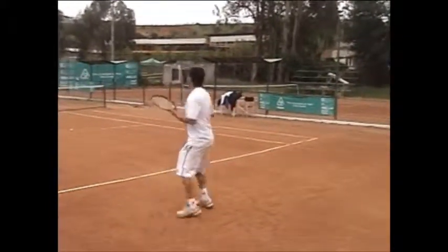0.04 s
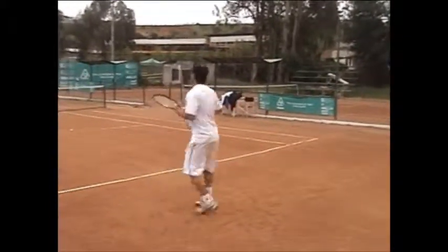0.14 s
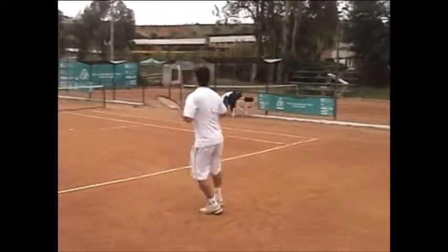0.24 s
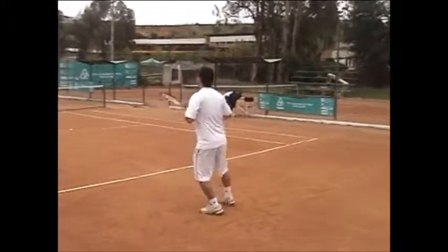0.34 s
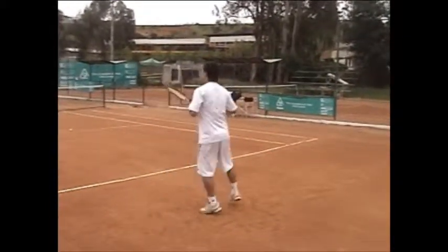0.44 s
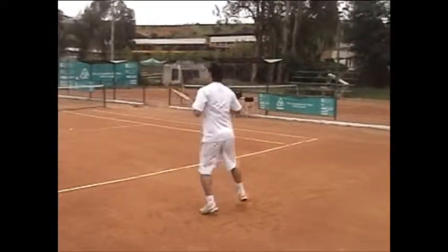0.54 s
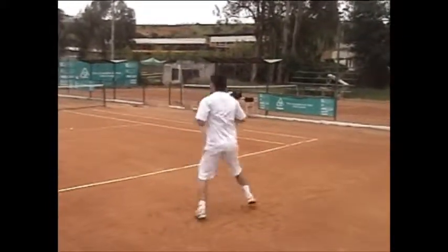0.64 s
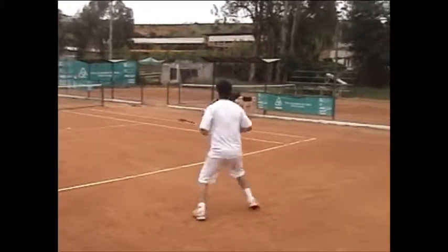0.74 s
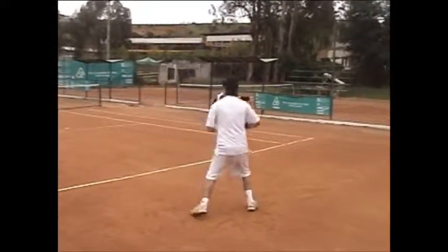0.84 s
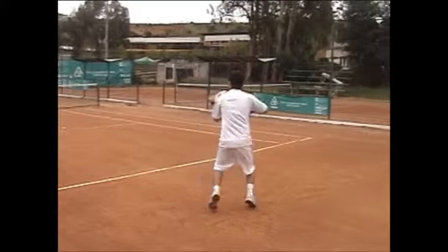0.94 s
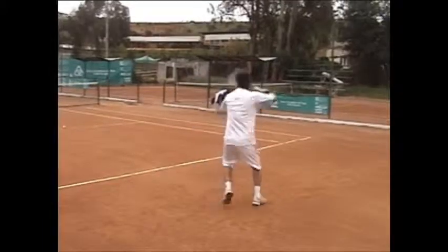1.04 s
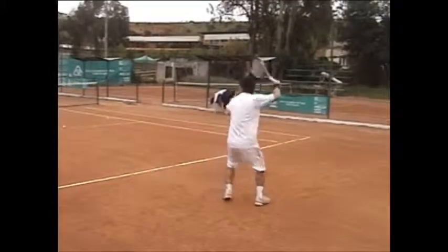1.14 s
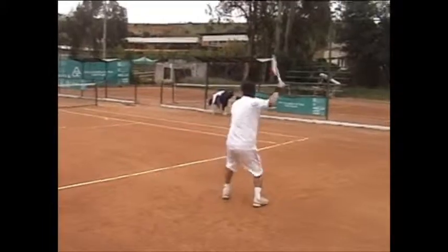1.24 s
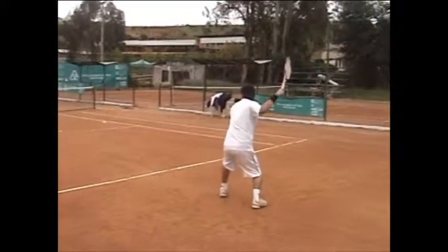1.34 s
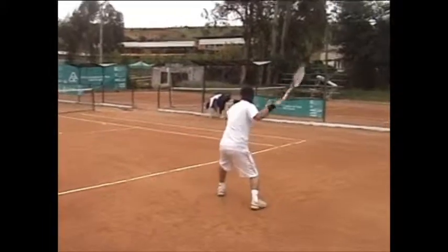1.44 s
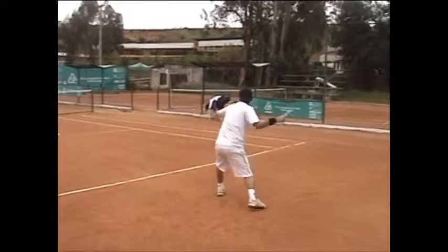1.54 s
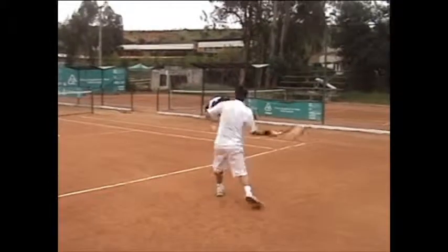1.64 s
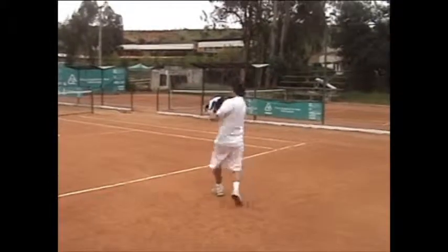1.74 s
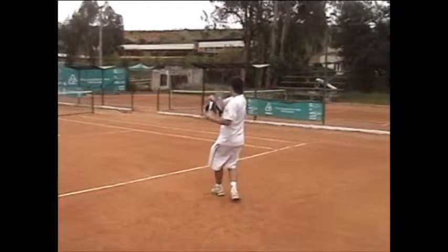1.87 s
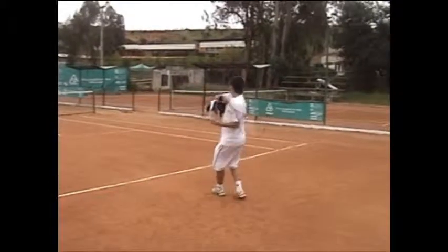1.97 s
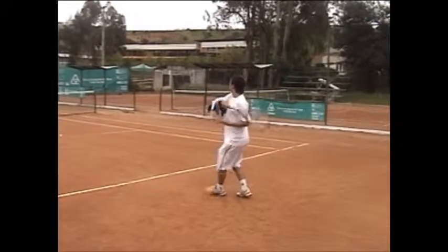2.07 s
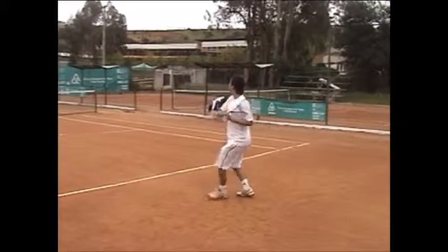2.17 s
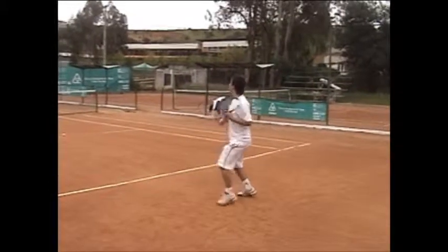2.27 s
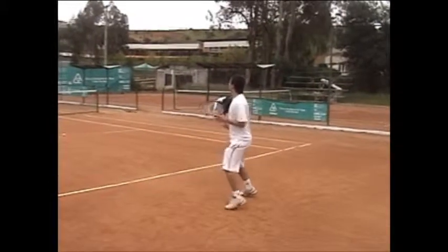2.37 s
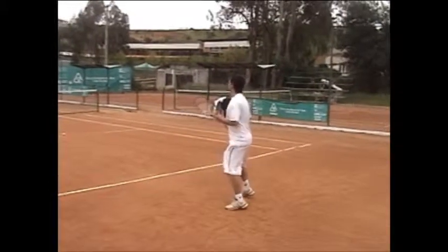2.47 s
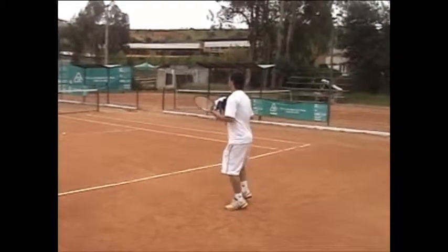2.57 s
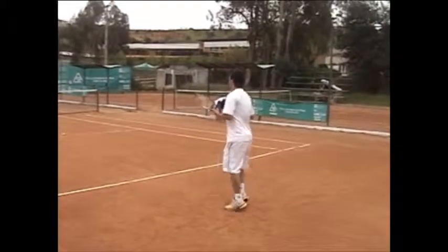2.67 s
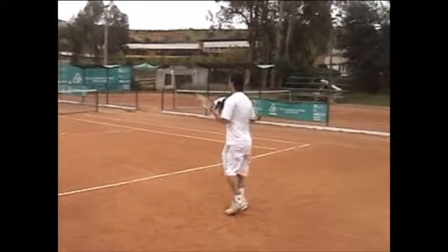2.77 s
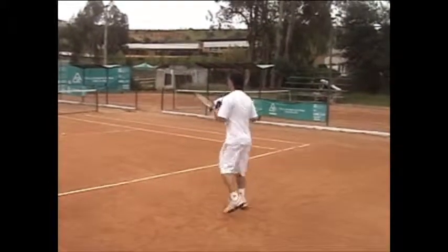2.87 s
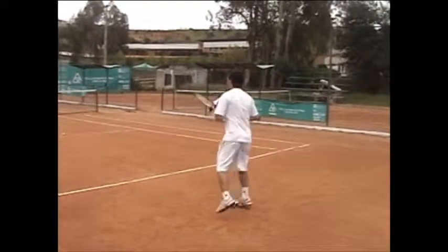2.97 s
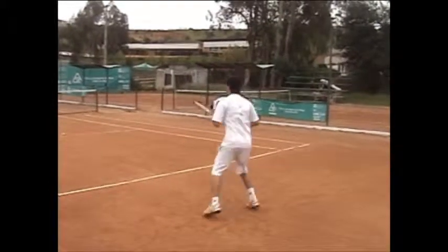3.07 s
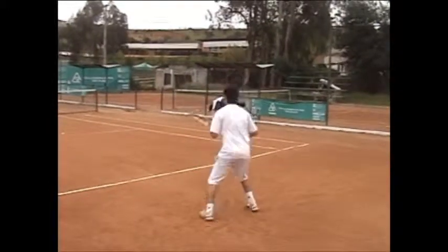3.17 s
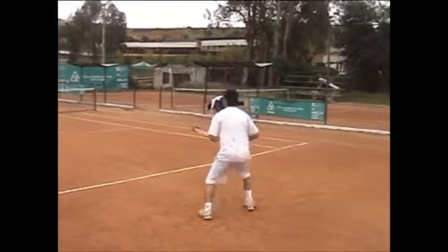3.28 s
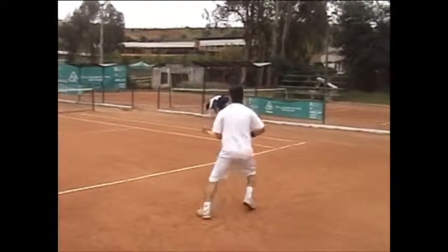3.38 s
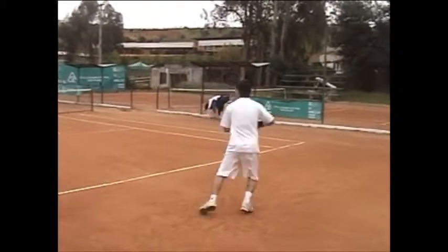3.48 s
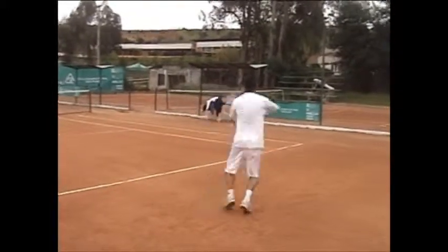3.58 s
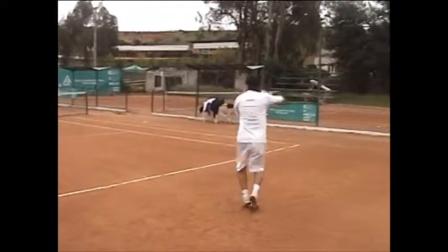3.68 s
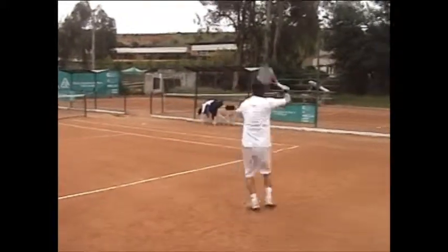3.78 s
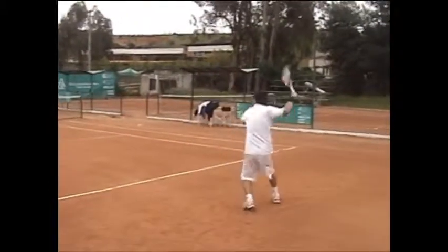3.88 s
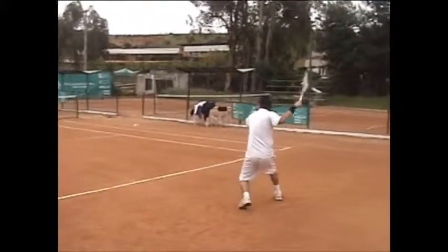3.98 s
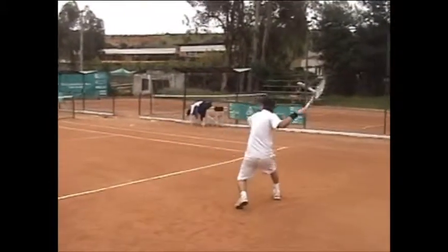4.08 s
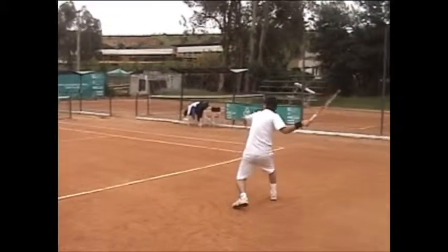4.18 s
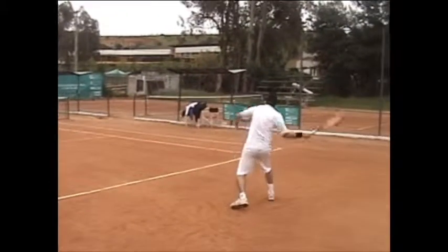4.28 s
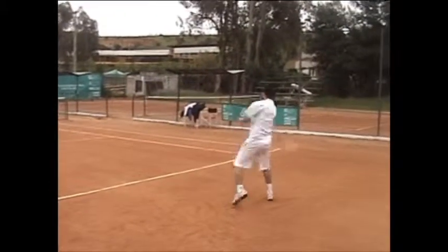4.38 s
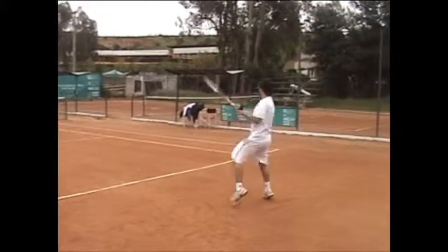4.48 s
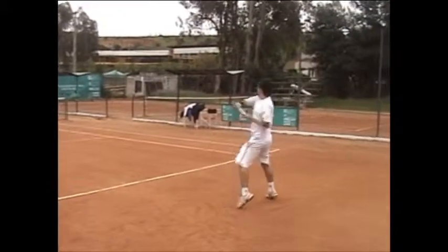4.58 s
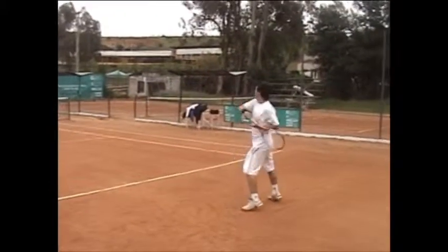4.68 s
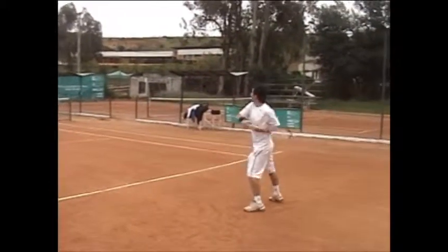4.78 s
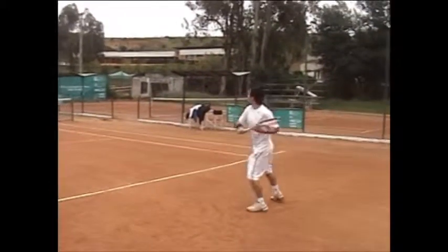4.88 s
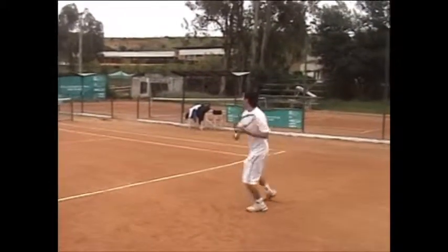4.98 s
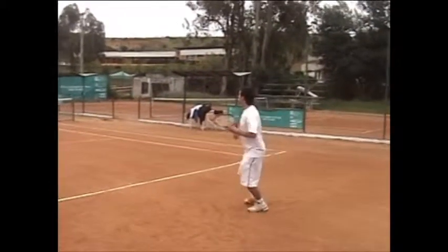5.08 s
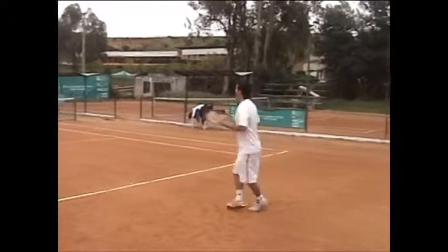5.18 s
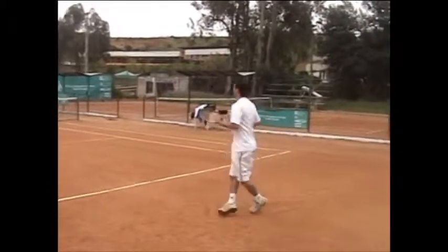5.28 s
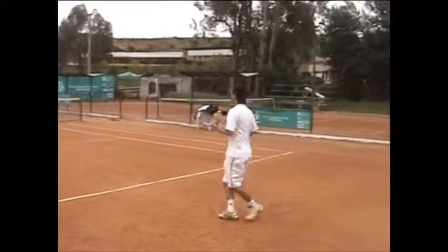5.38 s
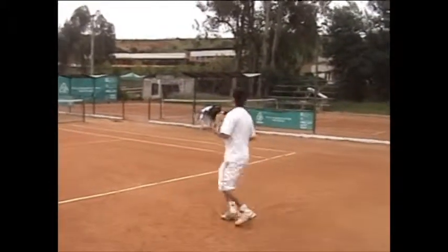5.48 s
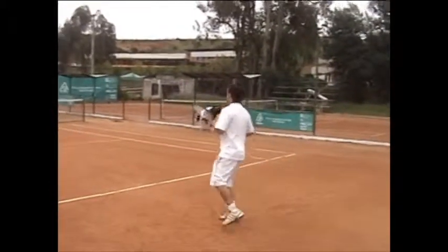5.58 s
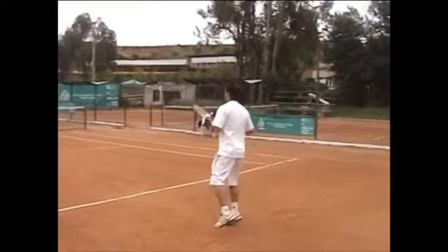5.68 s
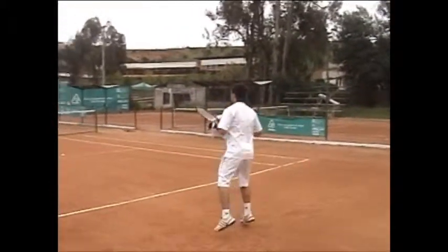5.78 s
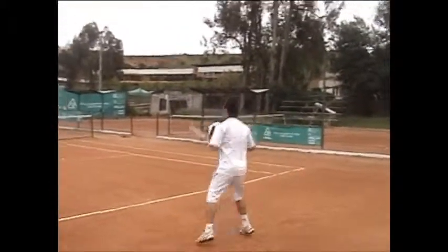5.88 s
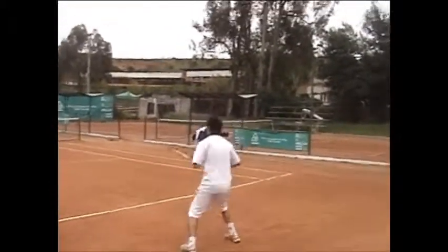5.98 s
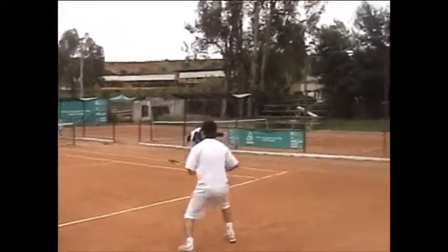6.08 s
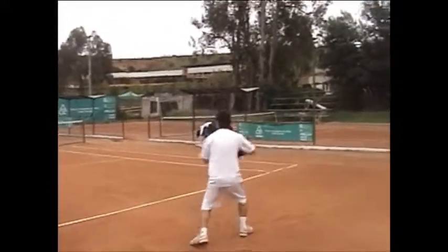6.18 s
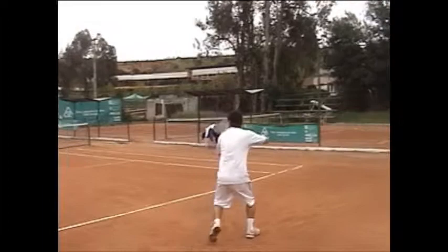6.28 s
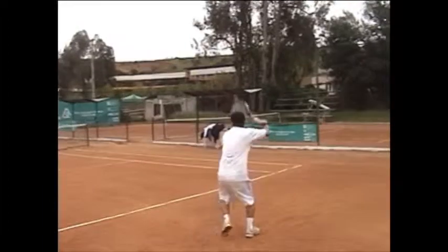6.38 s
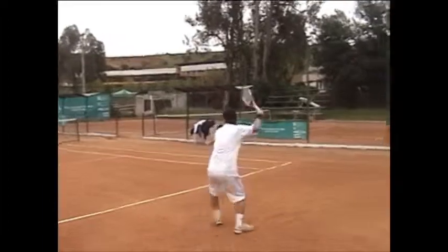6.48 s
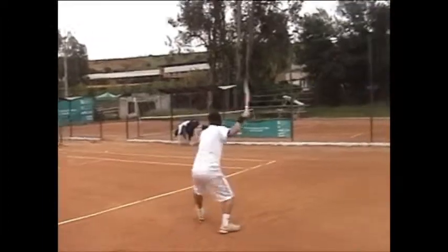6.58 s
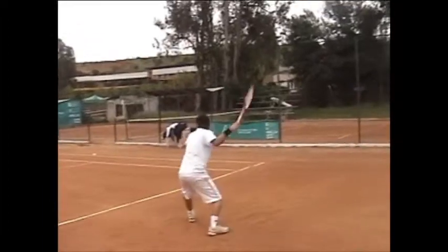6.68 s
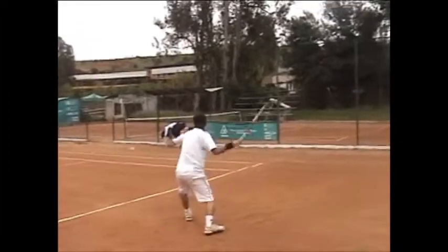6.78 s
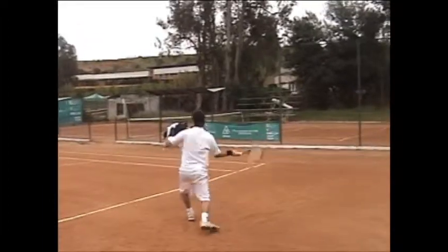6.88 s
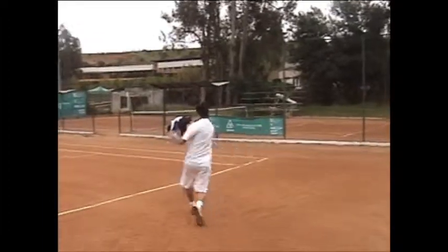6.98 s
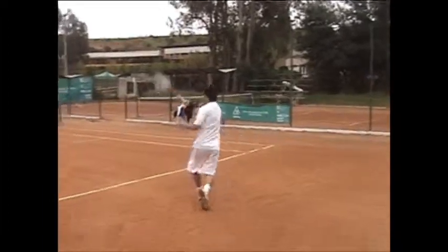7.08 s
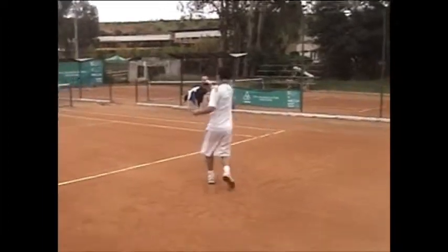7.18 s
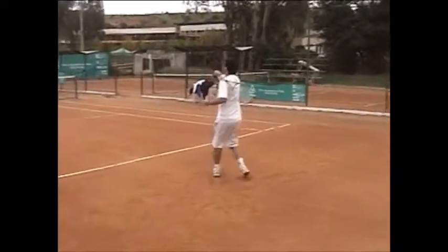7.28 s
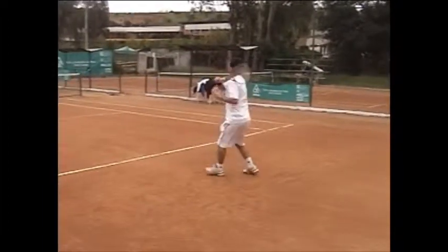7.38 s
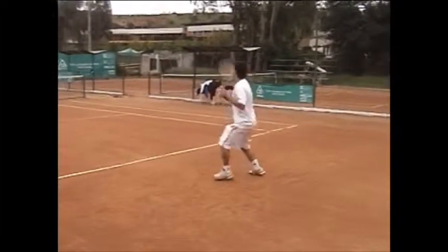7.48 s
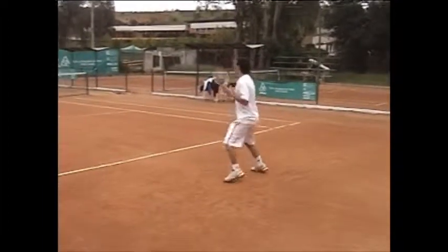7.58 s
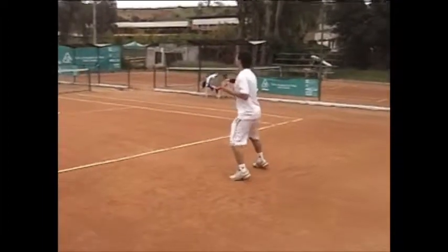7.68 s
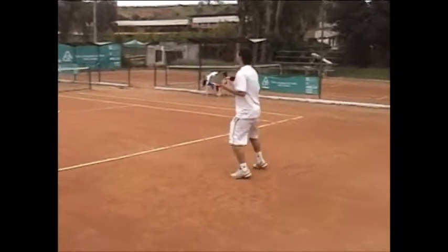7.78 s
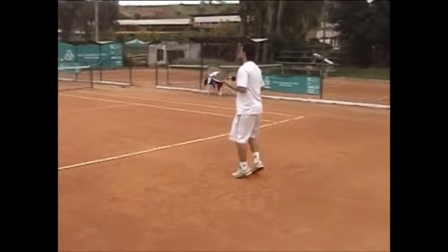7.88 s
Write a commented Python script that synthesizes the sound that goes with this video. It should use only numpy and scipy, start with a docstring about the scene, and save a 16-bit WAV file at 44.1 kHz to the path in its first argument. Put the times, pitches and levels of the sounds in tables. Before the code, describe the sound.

A tennis rally on an outdoor clay court is heard from just behind one player, over a soft, steady rumble and rustling leaves. The partner's racket gives a duller, distant thud at about 0.6, 3.1 and 5.9 seconds. The near player answers with loud, sharp cracks and briefly ringing strings at 1.9, 4.6 and 7.1 seconds. Every hit has a short echo. The ball thumps softly on the ground at 1.4, 4 and 6.6 seconds, and more faintly at 2.8 and 5.4. Shoes crunch and scuff on grit throughout, with longer grinding slides from 1.2 to 2.2 seconds and again around 4, plus a few low heel thumps. Small birds chirp faintly in the first second and a half and again from 5 to 6 seconds. A few light knocks come in the last two seconds among the footsteps.

```python
"""A distant rumble, shoes crunching on grit and small birds; then a forehand rally on an outdoor clay court,
heard from just behind one player. The partner's strokes thud, the near ones crack: the ball flattens,
strings and frame ring, fences and buildings throw each hit back. Soles slide and grind the clay grains;
ball and heels thump the packed ground."""
import sys
import numpy as np
from scipy import signal
from scipy.fft import rfft, irfft, next_fast_len
from scipy.io import wavfile

SR = 44100
rng = np.random.default_rng(int(sys.argv[2]) if len(sys.argv) > 2 else 0)


def dump(signal):
    """Clip the signal to [-1, 1] and save it as 16-bit WAV at the path in sys.argv[1]."""
    limited = np.clip(np.atleast_2d(signal).T, -1, 1)
    pcm = np.round(limited * 32767).astype(np.int16)
    wavfile.write(sys.argv[1], SR, pcm)


N = 349713
TIME_S = np.arange(N) / SR
HIT_TIME_S = TIME_S[:SR]

# rumble and leaves (frequency [Hz], relative density [dB])
AIR_SPECTRUM = [(15, -40), (25, -14), (44, -7.5), (75, -14.5), (158, -1.5), (191, -6), (237, -2),
                (373, -13), (404, -11), (691, -11), (2430, -23), (3350, -23.5), (5010, -26), (6370, -28),
                (15000, -52)]
# their loudness (time [s], level [dB])
AIR_LEVEL = [(0, -43), (3, -43.5), (5.2, -43.5), (6.9, -41.5), (7.93, -42)]

# footsteps (time [s], level [dB], t60 [s], relative fine grit [dB])
STEPS = [(.119, -40, .066, -18), (.29, -38, 0.13, -3), (0.711, -33, 0.48, -10.5), (1.09, -31.5, 0.059, -5),
         (2.352, -43, 0.12, -4.5), (2.485, -36.5, .26, -9), (2.814, -43.5, .17, -7.5),
         (3.206, -35, 0.079, -3.5), (3.24, -34.5, 0.38, -8.5), (3.381, -40, 0.12, -3.5),
         (3.522, -31.5, 0.16, -4.5), (3.619, -42, 0.11, -3.5), (3.836, -38.5, .25, -3.5),
         (5.426, -34, 0.25, -9), (6.02, -41, 0.096, 0.5), (6.051, -39.5, 0.96, -5.5),
         (6.25, -40.5, 0.23, -5), (6.364, -42, 0.15, 0.5), (6.691, -49, .025, 6), (7.18, -52.5, 0.21, 11),
         (7.468, -35.5, 0.25, -1), (7.713, -34.5, 0.47, -9.5), (7.864, -39, 0.58, -20)]
# a shoe brushes the clay in a turn (time [s], length [s], level [dB], relative fine grit [dB])
SCUFFS = [(0.993, 0.078, -45.5, 0), (1.759, 0.081, -46, 2), (4.718, 0.11, -47.5, 1), (6.455, 0.17, -37, -2),
          (6.568, 0.27, -44.5, -5), (6.788, 0.21, -43, -11), (6.915, 0.2, -45.5, 4)]
# coarse and fine grains underfoot (frequency [Hz], relative density [dB])
STEP_COARSE_SPECTRUM = [(200, 1), (700, 0), (1800, 3), (2700, -3), (4200, -2.5), (6500, -33), (12000, -51)]
STEP_FINE_SPECTRUM = [(900, -9), (2500, 0.5), (4200, 6), (6500, 4), (9500, 1.5), (10700, -13.5),
                      (13500, -15), (15500, -38)]

# a songbird's syllable (delay [s], length [s], start [Hz], middle [Hz], end [Hz], gain [dB])
SYLLABLE_NOTES = [(0, .06, 5400, 5950, 6900, -5), (.008, .042, 6750, 7200, 7900, -8.5),
                  (.045, .05, 4950, 5400, 6050, -4.5), (0.079, .042, 5900, 6150, 5100, -1)]
# syllables, sung in pairs (time [s], level [dB])
SYLLABLES = [(.337, -51), (0.488, -50), (4.872, -50.5), (5.021, -47.5)]
# another bird's diving chips (time [s], level [dB])
CHIPS = [(.872, -42.5), (1.395, -38.5), (5.382, -42.5), (5.959, -38.5)]
CHIP_S, CHIP_SHAPE_HZ = 0.041, [7900, 5520, 4830]
CHIP_HOLD_S, CHIP_HOLD_DB = 0.081, -16.5   # the last pitch lingers
# up-and-down notes (time [s], length [s], note rate [1/s], centre [Hz], sweep [Hz], level [dB])
TWITTERS = [(0.928, .24, 30, 3980, 1010, -49), (5.178, .19, 65, 3230, 700, -51.5),
            (5.493, .33, 42, 3740, 1410, -47.5)]
# lone far calls (time [s], length [s], start [Hz], end [Hz], level [dB])
FAR_CALLS = [(4.95, 0.046, 3710, 2360, -50.5), (4.97, 0.17, 1480, 1485, -55),
             (5.571, 0.083, 1240, 1252, -49.5)]

# partner's strokes (time [s], gain [dB], pitch [ratio], crack trim [dB])
FAR_STROKES = [(0.5959, -0.5, 0.94, 2), (3.1287, -1, 0.97, 4), (5.9116, 1.5, 0.97, 3)]
# near player's strokes (time [s], gain [dB], pitch [ratio], crack trim [dB], ball ring trim [dB])
NEAR_STROKES = [(1.8813, 0.5, 0.93, 5.5, -13), (4.5510, 0, 0.93, 4, -5.5), (7.109, 1.5, 0.96, 3.5, -3)]
# racket and ball modes (frequency at pitch 1 [Hz], gain [dB], t60 [s])
FAR_MODES = [(254, -26.5, 0.16), (575, -5, 0.025), (917, -14.5, 0.06), (1060, -13, 0.032),
             (1554, -31, 0.044), (2900, -43, 0.07)]
NEAR_MODES = [(259, 6.5, 0.018), (460, -12, 0.061), (610, -27.5, 0.05), (861, 7, 0.024),
              (1153, -6.5, 0.041), (2124, -27, .06), (3110, -36, 0.064), (4210, -37, 0.29)]
# echoes off fences and buildings (delay [s], gain [dB])
FAR_ECHOES = [(0.0098, -21), (0.0181, -16.5), (0.029, -17), (0.043, -29), (0.067, -17), (.112, -29),
              (0.151, -43), (.212, -25)]
NEAR_ECHOES = [(0.0232, -8.5), (0.0319, -5.5), (0.045, -19), (0.0997, -20.5), (.123, -24), (.1815, -24.5),
               (0.212, -29), (0.265, -27.5)]
# felt crack and diffuse tails (frequency [Hz], relative density [dB])
CRACK_SPECTRUM = [(300, 15.5), (1200, 5), (2000, 0), (3000, -1), (5500, -3.5), (8000, -8), (10500, -19),
                  (14000, -37)]
FAR_TAIL_SPECTRUM = [(80, -57), (180, 7), (400, 6), (950, 3.5), (1500, -8), (3500, -17), (8000, -28),
                     (14000, -47)]
NEAR_TAIL_SPECTRUM = [(60, -27), (150, -3.5), (300, -2.5), (850, -2), (1400, -8.5), (2500, -15),
                      (4200, -19.5), (8000, -27), (14000, -50)]

# sole friction, one curve per slide (time [s], level [dB])
SLIDE_FRICTION = [
    [(1.152, -58), (1.158, -33), (1.17, -24), (1.23, -37.5)],
    [(1.23, -38), (1.254, -29.5), (1.326, -36.5), (1.366, -31.5), (1.468, -38.5), (1.57, -37), (1.58, -38),
     (1.63, -32), (1.648, -35.5), (1.736, -35.5), (1.76, -57)],
    [(1.897, -27), (1.899, -30.5), (1.967, -29), (1.975, -32.5), (2.057, -35), (2.061, -32.5), (2.197, -52),
     (2.2, -49)],
    [(3.915, -41), (3.953, -27), (4.121, -30), (4.161, -36), (4.19, -56)],
]
# footing, one row per slide (weight on the foot [dB], loose grit [dB])
SLIDE_FOOTING = [(-2, -5), (0, 0), (-9.5, 3.5), (-2, -0.5)]
# ground clay, coarse grains, thrown grit (frequency [Hz], relative density [dB])
GRIND_SPECTRUM = [(200, -5), (380, -4.5), (530, 3.5), (1000, 1), (1400, -2), (2200, -21), (5000, -53.5)]
RASP_SPECTRUM = [(700, -9), (1150, -0.5), (1550, 5), (2200, 2), (2800, -9.5), (4000, -4.5), (7000, -48)]
SPRAY_SPECTRUM = [(1200, -5), (2500, 4.5), (4000, 4.5), (6500, -1), (9300, -6.5), (10700, -18),
                  (13500, -22), (15500, -44)]
GRIND_DB, GRIND_SWELL_DB, RASP_DB, SPRAY_DB = -6, 6.5, -3, -9
BITE_DB, BITE_S = 7, 0.048   # the sole digs in at the start
PILE_DB, PILE_S = 10, 0.1   # heaped grit sprays out before the stop

# ball bounces (time [s], level [dB], relative tick [dB])
BOUNCES = [(1.369, -23.5, -1), (2.755, -32.5, -4), (3.99, -20, -5), (5.421, -27.5, -1),
           (6.646, -21.5, -1.5)]
# hard heel landings (time [s], level [dB])
HEELS = [(2.381, -37), (2.610, -40), (4.158, -28.5), (6.071, -31)]
# small sharp knocks around the court (time [s], level [dB], relative tick [dB])
TAPS = [(5.887, -35, -2), (6.576, -24.5, -11), (6.594, -24.5, 3), (7.627, -33, -4), (7.867, -33.5, 2.5)]
BOUNCE_HZ, HEEL_HZ, TAP_HZ = 241, 104, 660


def from_db(db):
    return 10 ** (np.asarray(db) / 20)


def unit_rms(x):
    return x / np.sqrt(np.mean(x ** 2) + 1e-20)


def fade(t60_s, time_s=HIT_TIME_S):
    return from_db(-60 * time_s / t60_s)


def rise(tau_s):
    return 1 - np.exp(-HIT_TIME_S / tau_s)


def ring(hz, t60_s):
    return np.sin(2 * np.pi * hz * HIT_TIME_S) * fade(t60_s)


def add(track, sound, at_s):
    start = round(at_s * SR)
    n = min(sound.shape[-1], track.shape[-1] - start)
    track[..., start:start + n] += sound[..., :n]


def butter(x, hz, kind, order=2):
    return signal.sosfilt(signal.butter(order, hz, kind, fs=SR, output="sos"), x + 1e-18)


def delayed(x, delay_s):
    index = np.arange(len(x))
    return np.interp(index - delay_s * SR, index, x, left=0)


def wander(per_s):
    """Random values joined by straight lines."""
    return np.interp(TIME_S * per_s, np.arange(SR), rng.standard_normal(SR))


def colour(x, spectrum):
    """Give noise a spectrum; rms 1."""
    n = x.shape[-1]
    size = next_fast_len(n)
    hz, db = np.transpose(spectrum)
    bin_hz = np.maximum(np.arange(size // 2 + 1) * SR / size, 1)
    gain = from_db(np.interp(np.log(bin_hz), np.log(hz), db))
    low_cut = np.minimum(bin_hz / hz[0], 1) ** 2
    return unit_rms(irfft(rfft(x, size) * gain * low_cut, size)[..., :n])


def stereo(pair, side_db):
    """Mid and side to left and right; bass stays centred."""
    side = from_db(side_db) * butter(pair[1], 390, "high", order=1)
    return np.array([pair[0] + side, pair[0] - side])


def noise(spectrum, side_db, size=SR):
    return stereo(colour(rng.standard_normal((2, size)), spectrum), side_db)


def surroundings(hum_hz=51, hum_db=-57):
    """Distant rumble, rustling leaves and a faint wavering hum."""
    air_gain = from_db(np.interp(TIME_S, *np.transpose(AIR_LEVEL)))
    air = air_gain * noise(AIR_SPECTRUM, side_db=-5, size=N)
    hum = from_db(hum_db + 2.8 * wander(per_s=4.76)) * np.sin(2 * np.pi * hum_hz * TIME_S)
    return air + hum


def grains(spectrum, per_s, spread_db):
    """Clay grains crack at random, in clumps as the sole grips and slips."""
    sizes = from_db(spread_db * np.minimum(rng.exponential(1, (2, N)), 3))
    signs = rng.choice([-1, 1], (2, N))
    clumps = from_db(2 * wander(per_s=110))
    cracks = rng.random((2, N)) < per_s / SR
    return stereo(colour(clumps * sizes * signs * cracks, spectrum), side_db=-15)


def tread(t60_s, rise_s=0.0051):
    """A foot presses down quickly and lets go."""
    return np.minimum(HIT_TIME_S / rise_s, 1) * fade(t60_s, np.maximum(HIT_TIME_S - rise_s, 0))


def steps():
    """Steps and scuffs press the clay: coarse grains crunch, fine ones hiss."""
    touches = [(at_s, db, fine_db, tread(t60_s)) for at_s, db, t60_s, fine_db in STEPS]
    for at_s, length_s, db, fine_db in SCUFFS:
        touches.append((at_s, db, fine_db, signal.windows.tukey(int(length_s * SR), alpha=0.71)))
    coarse, fine = np.zeros((2, N))
    for at_s, db, fine_db, pressure in touches:
        add(coarse, from_db(db) * pressure, at_s)
        add(fine, from_db(db + fine_db) * pressure, at_s)
    return (coarse * grains(STEP_COARSE_SPECTRUM, per_s=2500, spread_db=5.5)
            + fine * grains(STEP_FINE_SPECTRUM, per_s=5500, spread_db=5.5))


def whistle(hz, db):
    """A bird's pure tone, swelling and fading."""
    return from_db(db) * np.sin(2 * np.pi * np.cumsum(hz) / SR) * signal.windows.tukey(len(hz), .6)


def glide(length_s, shape_hz, db):
    """A whistle bent through pitches evenly spaced in time."""
    bend = np.polyfit(np.linspace(0, 1, len(shape_hz)), shape_hz, len(shape_hz) - 1)
    return whistle(np.polyval(bend, np.linspace(0, 1, int(length_s * SR))), db)


def birds(trees_db=-3.5, trees_t60_s=0.26):
    """Syllables, chips, twitters and far calls, scattered by the trees."""
    song = np.zeros(N)
    for at_s, db in SYLLABLES:
        for delay_s, length_s, *shape_hz, note_db in SYLLABLE_NOTES:
            add(song, glide(length_s, shape_hz, db + note_db), at_s + delay_s)
    for at_s, db in CHIPS:
        add(song, glide(CHIP_S, CHIP_SHAPE_HZ, db), at_s)
        add(song, glide(CHIP_HOLD_S, CHIP_SHAPE_HZ[-1:], db + CHIP_HOLD_DB), at_s + CHIP_S)
    for at_s, length_s, per_s, centre_hz, sweep_hz, db in TWITTERS:
        ramp_hz = sweep_hz * np.linspace(-.5, .5, int(.7 * SR / per_s))
        for k, (late, sharp, loud) in enumerate(rng.standard_normal((int(length_s * per_s), 3))):
            note_hz = centre_hz * (1 + 0.035 * sharp) + (-1) ** k * ramp_hz
            add(song, whistle(note_hz, db + 2 * loud), at_s + (k + 0.13 * late) / per_s)
    for at_s, length_s, *shape_hz, db in FAR_CALLS:
        add(song, glide(length_s, shape_hz, db), at_s)
    trees = unit_rms(rng.standard_normal((2, SR)) * fade(trees_t60_s)) / np.sqrt(SR)
    return song + from_db(trees_db) * signal.fftconvolve(song[None], trees, axes=1)[:, :N]


def thump(hz, peak_s):
    """One push of air as the ball flattens and springs back."""
    phase_squared = (np.pi * hz * (HIT_TIME_S - peak_s)) ** 2
    return (1 - 2 * phase_squared) * np.exp(-phase_squared) * rise(0.0011)


def strings(modes, pitch, rise_s):
    """Strings and frame ring up while the ball dwells on the racket."""
    partials = [(-1) ** k * from_db(db) * ring(hz * pitch, t60_s)
                for k, (hz, db, t60_s) in enumerate(modes)]
    return sum(partials) * rise(rise_s)


def crack(t60_s, side_db):
    """Felt slaps and scrapes across the strings."""
    return noise(CRACK_SPECTRUM, side_db) * fade(t60_s) * rise(0.00039)


def echoes(hit, paths, cutoff_hz):
    """Fences and buildings return a stroke's midrange."""
    midrange = butter(butter(hit, cutoff_hz, "low"), 184, "high")
    return sum(from_db(db) * delayed(midrange, delay_s) for delay_s, db in paths)


def scatter(spectrum, early_db, early_t60_s, late_db, late_t60_s):
    """Diffuse tail off the nearby fences, then duller off the trees."""
    fences = from_db(early_db) * fade(early_t60_s) * noise(spectrum, side_db=-5)
    dull = butter(noise(spectrum, side_db=-5), 3400, "low", order=1)
    trees = from_db(late_db) * fade(late_t60_s) * dull
    return (fences + trees) * rise(0.0014)


def far_strokes():
    """The partner's racket meets the ball: mostly thump, slightly left."""
    out = np.zeros((2, N))
    for at_s, db, pitch, crack_db in FAR_STROKES:
        push = thump(470 * pitch, peak_s=0.00196)
        hit = from_db(-3) * push + strings(FAR_MODES, pitch, rise_s=0.00012)
        felt = from_db(crack_db - 17.5) * crack(t60_s=0.018, side_db=-3.5)
        direct = hit - from_db(-23) * delayed(hit, 0.00298) + felt
        walls = echoes(push + from_db(1) * hit, FAR_ECHOES, cutoff_hz=1010)
        tail = scatter(FAR_TAIL_SPECTRUM, early_db=-22, early_t60_s=0.2, late_db=-31.5, late_t60_s=0.89)
        add(out, from_db(db) * (direct + walls + tail), at_s)
    return out * from_db([[1.5], [-1.5]])


def slides():
    """A sliding sole bites and rasps, grinds under load, and sprays grit as it stops."""
    grind, rasp, spray = np.zeros((3, N))
    for curve, (weight_db, loose_db) in zip(SLIDE_FRICTION, SLIDE_FOOTING):
        times_s, db = np.transpose(curve)
        start_s, stop_s = times_s[0], times_s[-1]
        friction = from_db(np.interp(TIME_S, times_s, db)) * (TIME_S > start_s) * (TIME_S < stop_s)
        load = np.sqrt(np.sin(np.pi * np.interp(TIME_S, [start_s, stop_s], [0, 1])))
        bite_db = BITE_DB * np.exp(-np.abs(TIME_S - start_s) / BITE_S)
        pile_db = PILE_DB * np.exp(-np.abs(stop_s - TIME_S) / PILE_S)
        grind += friction * from_db(GRIND_DB + weight_db + GRIND_SWELL_DB * load)
        rasp += friction * from_db(RASP_DB + bite_db - pile_db / 2)
        spray += friction * from_db(SPRAY_DB + loose_db + bite_db + pile_db)
    return (grind * grains(GRIND_SPECTRUM, per_s=5800, spread_db=3.5)
            + rasp * grains(RASP_SPECTRUM, per_s=3000, spread_db=4.5)
            + spray * grains(SPRAY_SPECTRUM, per_s=9000, spread_db=6))


def knock(hz, db, tick_db):
    """Two cycles of thud and a short gritty tick."""
    cycles = hz * HIT_TIME_S
    thud = np.sin(2 * np.pi * cycles) * np.sin(np.pi * np.minimum(cycles / 2, 1))
    tick = from_db(tick_db) * noise(NEAR_TAIL_SPECTRUM, side_db=-4) * fade(t60_s=0.025)
    return from_db(db) * (thud + tick)


def knocks():
    """Ball and heels thump the packed clay; smaller things tap."""
    out = np.zeros((2, N))
    for at_s, db, tick_db in BOUNCES:
        add(out, knock(BOUNCE_HZ, db, tick_db), at_s)
    for at_s, db in HEELS:
        add(out, knock(HEEL_HZ, db, tick_db=-24), at_s)
    for at_s, db, tick_db in TAPS:
        add(out, knock(TAP_HZ, db, tick_db), at_s)
    return out


def ball_ring(rise_s=0.0096):
    """Air in the ball rings once it has left the strings."""
    return ring(hz=1653, t60_s=.125) * (1 - np.exp(-(HIT_TIME_S / rise_s) ** 2))


def near_strokes():
    """Close forehands: hard crack, ringing strings, a reflection off the ground."""
    out = np.zeros((2, N))
    for at_s, db, pitch, crack_db, ball_db in NEAR_STROKES:
        push = thump(360 * pitch, peak_s=0.0021)
        hit = from_db(-9) * push + strings(NEAR_MODES, pitch, rise_s=0.0028)
        hit += from_db(ball_db - 11) * ball_ring()
        hit = butter(hit, 78, "high")   # a racket radiates little bass
        ground = from_db(-12.5) * delayed(hit, 0.00416)
        felt = from_db(crack_db - 5.5) * crack(t60_s=0.024, side_db=-13.5)
        walls = echoes(push + from_db(-9) * hit, NEAR_ECHOES, cutoff_hz=930)
        tail = scatter(NEAR_TAIL_SPECTRUM, early_db=-18.5, early_t60_s=0.25, late_db=-32.5, late_t60_s=1)
        add(out, from_db(db) * (hit + ground + felt + walls + tail), at_s)
    return out


def scene():
    """Rally and footwork amid birds and distant rumble."""
    return near_strokes() + far_strokes() + knocks() + slides() + steps() + birds() + surroundings()


def record(dry):
    """Cut the deepest bass, round the peaks, cut the top."""
    ceiling, stopband_hz = .94, 15600
    rounded = ceiling * np.tanh(butter(dry, 22, "high") / ceiling)
    return signal.sosfilt(signal.cheby2(14, 70, stopband_hz, fs=SR, output="sos"), rounded)


dry = scene()
out = record(dry)
dump(out)
```